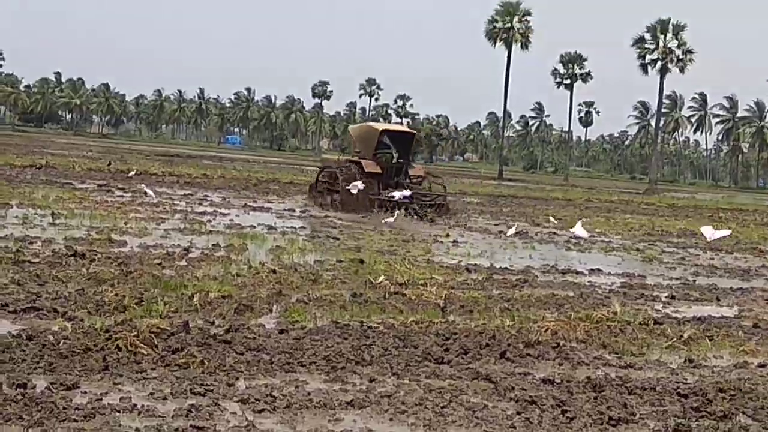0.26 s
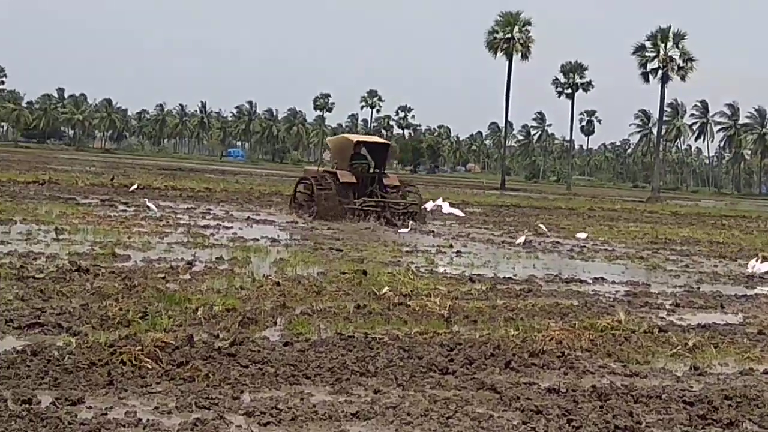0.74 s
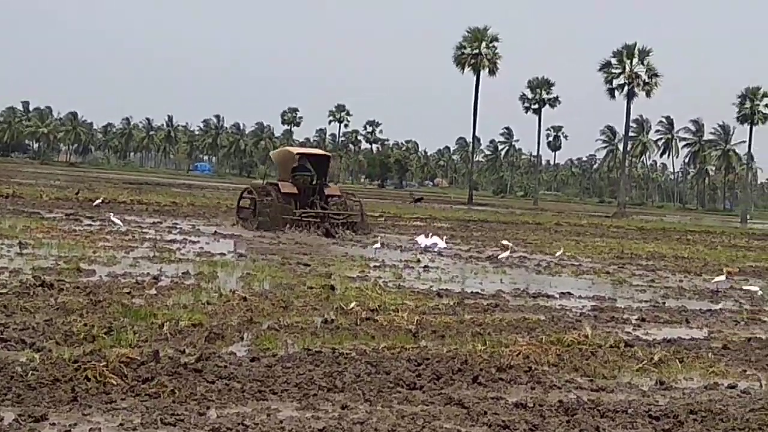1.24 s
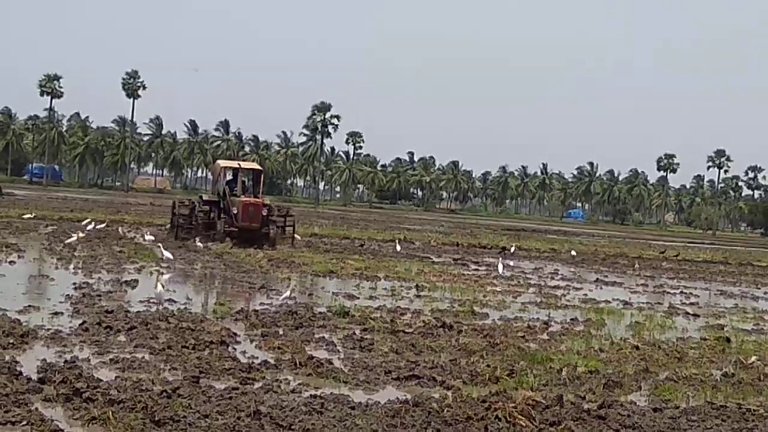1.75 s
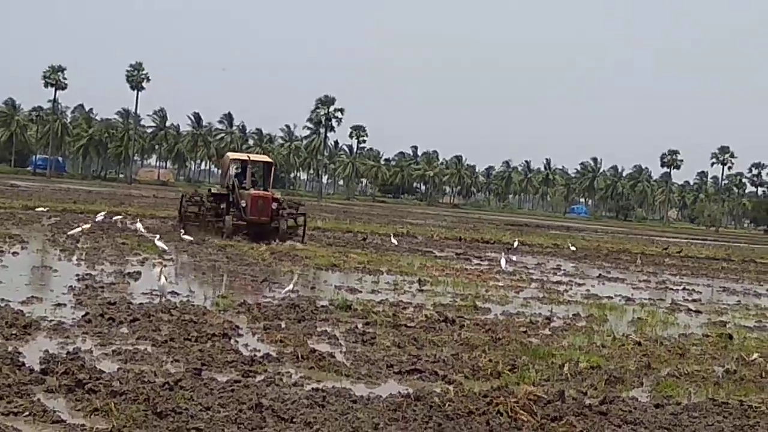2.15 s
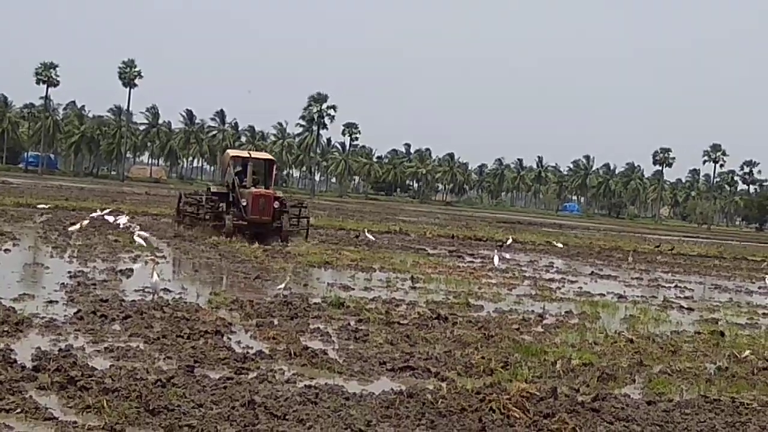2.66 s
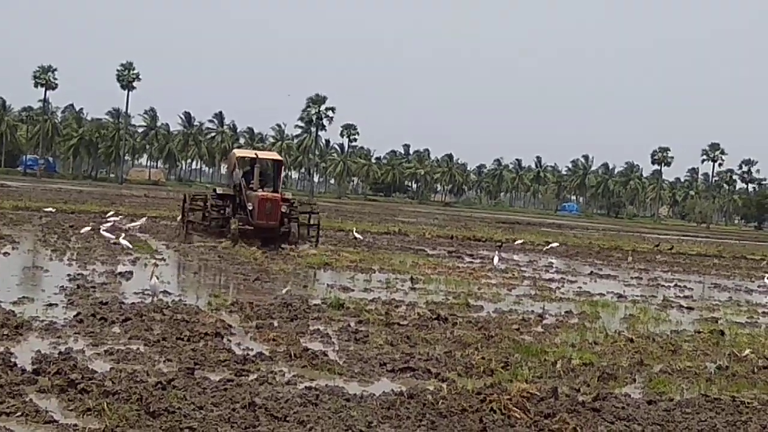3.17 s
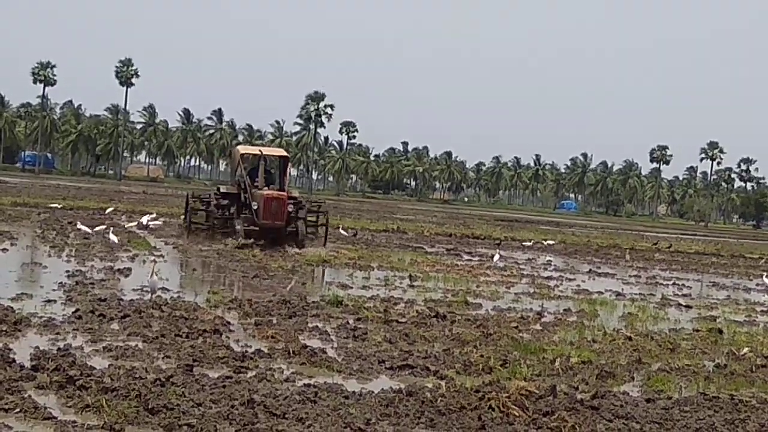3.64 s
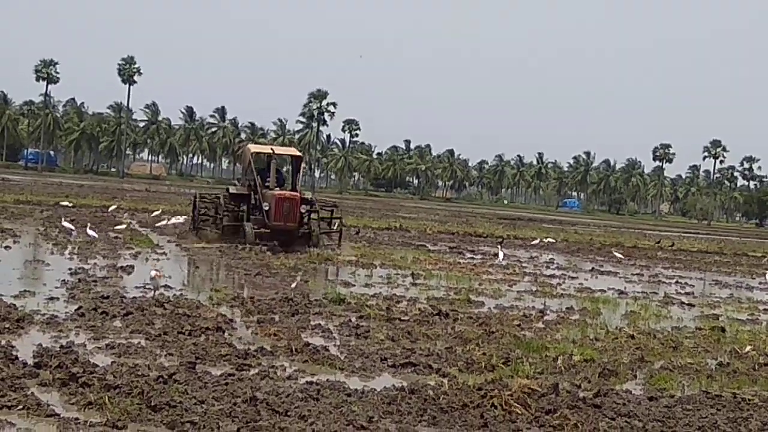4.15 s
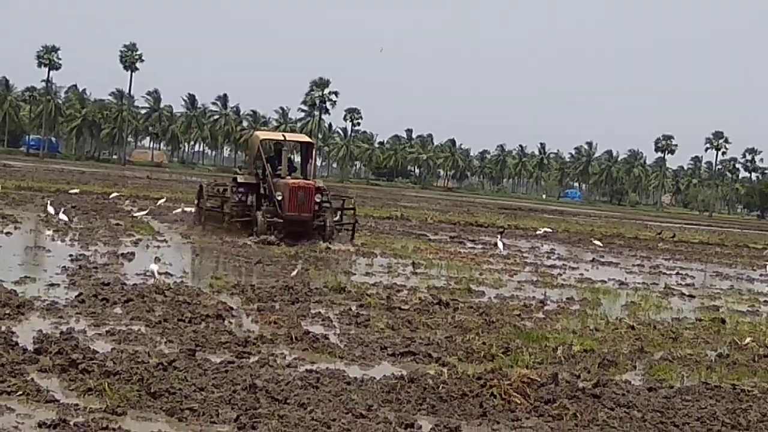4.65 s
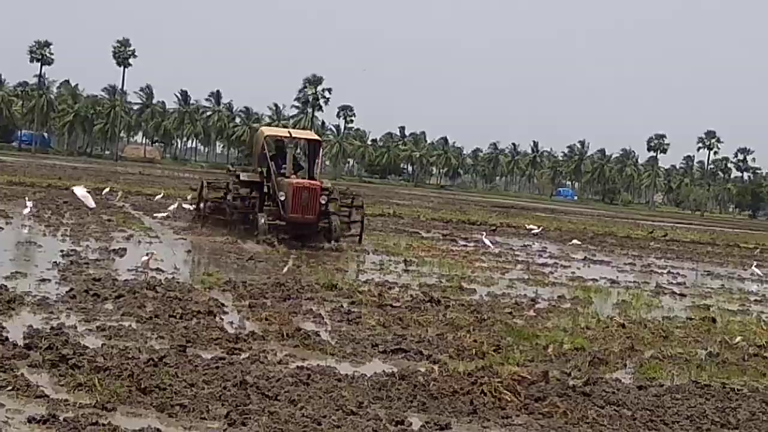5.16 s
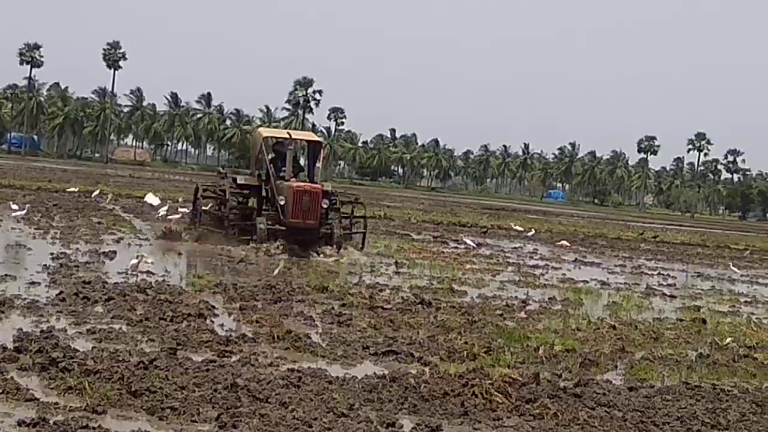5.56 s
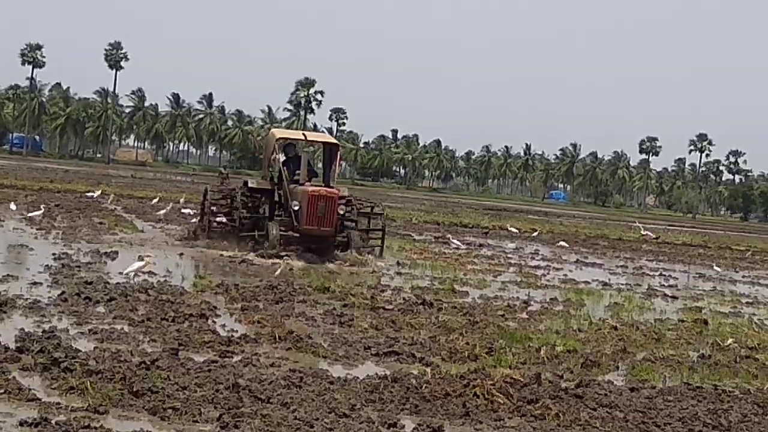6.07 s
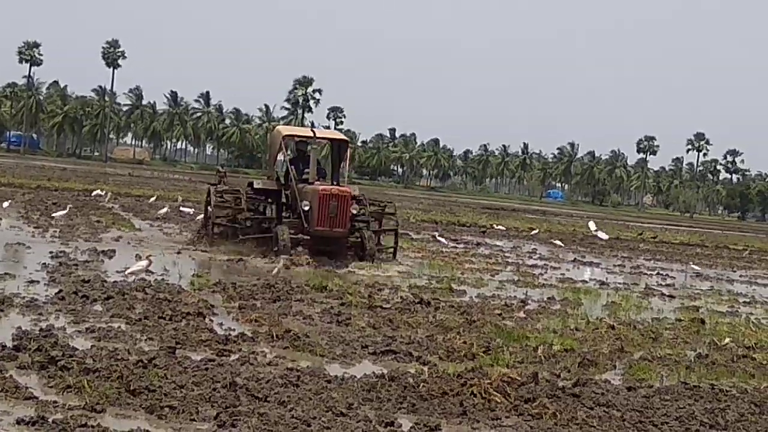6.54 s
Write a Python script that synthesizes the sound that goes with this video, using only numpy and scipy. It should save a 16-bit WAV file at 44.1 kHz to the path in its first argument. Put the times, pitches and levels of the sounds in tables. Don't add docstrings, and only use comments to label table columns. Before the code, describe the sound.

Outdoors in a flooded field, a handheld phone is overloaded by wind for just over a second: deep roaring and slapping, mostly on the left, with a thin tractor rattle behind. A sudden cut brings the diesel nearer, a low steady drone with block clatter and rapid valve ticking. Breaths of wind still bump the left side while the engine slowly grows louder.

```python
import sys
import numpy as np
from scipy import signal
from scipy.fft import rfft, irfft, dct, next_fast_len
from scipy.io import wavfile
from scipy.ndimage import uniform_filter1d, minimum_filter1d

SR = 44100
rng = np.random.default_rng(int(sys.argv[2]) if len(sys.argv) > 2 else 0)


def magnitude_from_level(level_db):
    exponent = np.asarray(level_db, float) / 20
    return 10 ** exponent


def dump_mix(stems):
    frames = np.atleast_2d(stems).T
    limited = np.clip(frames, -1, 1)
    pcm = np.round(limited * 32767).astype(np.int16)
    wavfile.write(sys.argv[1], SR, pcm)


N = 300321
TIME = np.arange(N) / SR
FFT_SIZE = next_fast_len(N, True)
HZ = np.arange(FFT_SIZE // 2 + 1) * SR / FFT_SIZE
CUT_S = 1.339
LULL_DB = -37

# (frequency [Hz], left level [dB], right level [dB])
WIND_COLOUR = [(20, -12, -23), (40.3, -8, -30), (73, -2.5, -14), (98, 4.5, -19.5), (131, 0.5, -27),
               (165, 4.5, -25), (192, -1.5, -23), (238, -2, -27), (407, -9.5, -44), (627, -18, -60),
               (886, -25, -52), (1350, -38, -51), (2120, -50.5, -59)]
# (low edge [Hz], high edge [Hz], swell [dB], swell rate [1/s])
EDDY_SWELLS = [
    (0, 110, 2, 14),
    (109.1, 190, 1.5, 12.6),
    (195.3, 330, 2.0, 16),
    (332, 5200, 1.4, 17.9),
]
# (time [s], level [dB])
GALE_STIFFNESS = [(0, -4), (.16, 0.5), (.27, -3), (.4, 0.5), (.62, 0.5), (.74, 0), (.84, 4), (.95, -1),
                  (1.04, 6), (1.12, -2), (1.24, 0), (1.339, 2.5)]
# (opening time [s], level [dB], closing rate [dB/s])
WIND_FILTER = [(0, -10, 3), (.22, -1, -4), (.88, -2, 63), (1.045, -2, 28), (1.2, 3, 5), (1.339, -10, 5),
               (1.55, -6, 32), (1.72, -5.5, 6.5), (2.6, -2.5, 33), (2.98, -3.5, 33), (3.63, -14.5, 1),
               (3.95, -4, 39), (4.279, -2.5, 15), (4.5, -3, 3), (5.15, -2, 15), (5.55, -3, 12),
               (5.85, -5.5, 0.5)]
# (time [s], level [dB])
GALE_CRACKS = [(0.051, -24.5), (0.074, -33), (0.107, -30), (0.129, -21), (0.149, -22), (0.182, -23),
               (0.225, -22.5), (0.271, -34), (0.295, -30), (0.361, -27), (0.383, -18), (0.432, -28),
               (0.455, -23), (0.484, -26), (0.542, -25.5), (0.572, -30), (0.614, -22), (0.668, -26),
               (0.692, -25.5), (0.727, -21), (0.764, -26), (0.825, -22), (0.852, -18.5), (0.876, -33),
               (0.896, -26), (0.939, -25), (0.984, -18), (1.017, -20.5), (1.047, -13), (1.09, -32),
               (1.127, -22), (1.174, -23), (1.197, -32), (1.228, -28), (1.299, -35)]
# (frequency [Hz], left level [dB], right level [dB])
FAR_COLOUR = [(875, -6.5, -19), (1500, -7, -18), (2510, -16.5, -21), (2980, -30, -28.5),
              (3560, -23.5, -36.5), (4070, -37, -46.5), (4370, -21.5, -48), (4720, -33, -36.5),
              (5000, -24, -35.5), (5600, -19.5, -42), (6000, -17.5, -30), (6980, -26, -32.5),
              (7570, -38, -38.5), (8300, -36, -43), (9060, -28, -45), (9800, -45, -30), (10800, -51, -47),
              (11540, -23, -48), (12600, -25, -39), (13400, -44, -32), (14000, -42, -32), (15200, -37, -34),
              (15400, -42, -52)]
# (frequency [Hz], phase [rad])
PORT_LEAD = [(0, 0), (2500, -1.6), (3790, -4.6), (4740, -3.4), (6370, -2.7), (7840, -9.3), (9820, -9.4),
             (10200, -10.5), (10600, -9.4), (11600, -15.5), (13000, -19.2), (14400, -18.8), (14900, -21.4),
             (15400, -22.1)]
# (time [s], rate [Hz])
FIRING_RATE = [(1.339, 60.47), (1.6, 63.13), (1.85, 65.6), (2.1, 67.93), (2.35, 69.26), (2.7, 69.59),
               (3.1, 68.95), (3.3, 69.61), (3.55, 70.26), (3.9, 69.21), (4.2, 70.17), (4.45, 67.22),
               (4.75, 68.28), (5.1, 69.01), (5.6, 68.99), (6.1, 69.1), (6.4, 69.02), (6.81, 67.24)]
# (start [s], length [s], level [dB])
LEFT_GUSTS = [(1.33, 0.037, -22), (1.397, 0.055, -13.5), (1.464, 0.062, -12.5), (1.577, 0.075, -13.5),
              (1.788, 0.062, -23), (1.898, 0.088, -20), (1.996, 0.068, -33), (2.127, .08, -18.5),
              (2.278, 0.097, -20.5), (2.396, 0.09, -23), (2.523, 0.089, -22), (2.664, 0.12, -14),
              (3.06, 0.081, -17), (3.195, 0.045, -27), (3.369, 0.061, -9.5), (3.456, 0.039, -15.5),
              (3.543, 0.1, -25), (3.68, 0.037, -14), (3.754, 0.029, -16.5), (3.808, 0.041, -19),
              (3.987, 0.065, -22), (4.074, 0.085, -15), (4.254, 0.35, -25), (4.555, 0.29, -21),
              (4.81, 0.06, -16), (4.894, 0.43, -22), (5.456, 0.12, -19), (5.551, 0.1, -18),
              (5.69, 0.32, -22.5), (6.116, 0.32, -20.5), (6.403, 0.091, -19.5), (6.48, 0.047, -14.5),
              (6.649, .07, -11.5), (6.741, .08, -9.5)]
# (time [s], level [dB])
ENGINE_EFFORT = [(1.35, -0.5), (1.6, 0.5), (1.85, 0), (2.2, 1.5), (2.5, -1.5), (2.68, 2.5), (2.9, -2.5),
                 (3.15, 1), (3.35, -1), (3.7, -1), (4.1, 1.5), (4.5, 3.5), (4.82, 5), (5.0, 3.5),
                 (5.45, 4.5), (5.65, 4), (6.2, 6), (6.81, 8)]
# (multiple of the firing rate [1], level [dB])
EXHAUST_PARTIALS = [(.5, -20), (1, -3), (1.5, -34), (2, 2), (3, -14.5), (4, -15.5), (5, -25.5)]
# (low edge [Hz], high edge [Hz], delay [turns], fall [turns], steady share [1], scatter [dB])
BLOCK_PARTS = [
    (200, 1080, 0.2, 0.63, 1.6, 3),
    (1035, 1900, 0.1084, 0.15, 0.63, 2),
    (1914, 2980, 0.06, 0.22, 0.9, 2.5),
    (3170, 4070, 0.038, 0.24, 1.1, 1),
]
# (frequency [Hz], left level [dB], right level [dB])
CLATTER_COLOUR = [(308, -2, -20), (453, -8, -28.5), (542, -10.5, -11), (840, -3, -14), (1103, -16.5, -22),
                  (1577, -9, -14), (2060, -16, -20), (2360, -15, -15), (2830, -17, -27.5), (3505, -19, -29),
                  (3930, -23.5, -34), (5090, -23.5, -33)]
# (frequency [Hz], width [Hz], depth [dB], negative = lift)
RINGING_PANELS = [(638, 19, -1), (748, 36, 1), (864, 18, -2.5), (996, 15, -2.5), (1600, 56, 0.5),
                  (2150, 150, -3), (2415, 66, -2)]
# (upper edge [Hz], level [dB], held until [s], return [s])
HELD_BASS = [
    (712, -10.5, 1.96, 0.033),
    (1050, -6.5, 1.6, 0.072),
]
# (low edge [Hz], high edge [Hz], delay [turns], fall [turns], steady share [1], scatter [dB])
VALVE_PARTS = [
    (3000, 9340, 0.0, 0.43, 2.5, 6.3),
    (8640, 11500, 0.02, 0.14, 0.56, 4.9),
    (11220, 19000, 0.025, 0.082, 0.21, 3.2),
]
# (frequency [Hz], left level [dB], right level [dB])
TICK_COLOUR = [(4200, -4.1, -12), (5000, -5, -8), (6200, -11.1, -7.3), (7500, -3.7, -6.6),
               (8600, -6.1, -7.9), (9200, -7.5, -5.8), (9900, 0.0, -1.7), (10800, -3.6, -5.0),
               (11800, -3.8, -8), (12500, -1.3, -8), (13500, -1.5, -4.1), (14500, -4.1, -4.6),
               (15300, -8.1, -7.7), (15900, -14.6, -14.7)]
# (time [s], level over the ticks [dB])
LOOSE_JANGLES = [(1.366, 5.5), (1.82, 2), (2.02, 0), (2.3, 2.5), (2.62, 1), (3.11, 0.5), (3.24, 0.5),
                 (3.31, 3), (3.55, -1.5), (3.89, 1), (5.6, 1)]
# (time [s], level [dB])
VALVE_KNOCKS = [(1.3388, -26), (1.3533, -18), (1.3698, -20), (1.3872, -14), (1.7699, -23), (1.8163, -13),
                (1.9978, -30), (2.0123, -17), (2.0717, -31), (2.1011, -18), (3.1133, -18), (3.2874, -25),
                (3.3019, -19), (4.0317, -29), (4.4657, -21), (4.5396, -21), (4.57, -21), (4.5989, -22),
                (4.6583, -24), (4.7471, -25), (4.8055, -25), (4.8933, -26), (4.9072, -24), (4.9362, -20),
                (4.9796, -22), (5.0374, -32), (5.1247, -25), (5.212, -22), (5.2554, -22), (5.2988, -21),
                (5.3427, -24), (5.4006, -27), (5.4585, -25), (5.4724, -24), (5.5019, -24), (5.5603, -25),
                (5.5742, -20), (5.5892, -19), (5.6032, -14), (5.6471, -20), (5.7773, -31), (5.9653, -30),
                (6.0087, -34), (6.0816, -19), (6.1539, -22), (6.1684, -21), (6.1828, -17), (6.2836, -22),
                (6.3415, -15), (6.3998, -23), (6.4143, -21), (6.4427, -19), (6.4722, -24), (6.4861, -16),
                (6.531, -20), (6.6188, -23), (6.6627, -16), (6.7366, -26), (6.7505, -22), (6.7795, -20)]
# (frequency [Hz], width [Hz], depth [dB])
LEFT_DIPS = [(5950, 320, 13), (6900, 280, 6), (8400, 330, 7), (9100, 330, 7), (11400, 250, 8),
             (14600, 400, 5), (15500, 400, 3)]
# (frequency [Hz], width [Hz], depth [dB])
RIGHT_DIPS = [(4150, 200, 7), (8150, 200, 6), (8850, 230, 8), (11500, 250, 6), (12600, 230, 6),
              (15600, 300, 3)]
# (frequency [Hz], width [Hz], depth [dB])
SUM_DIPS = [(3100, 290, 15), (5500, 200, 4), (8000, 300, 7), (8800, 200, 5), (11500, 250, 7),
            (15500, 400, 5)]
# (frequency [Hz], width [Hz], depth [dB])
LATE_SUM_DIPS = [(3100, 160, 5), (8500, 300, 4), (5450, 360, 9), (11500, 250, 5), (15500, 500, 8)]
# (frequency [Hz], width [Hz], depth [dB])
NARROW_DIPS = [(564, 26, 4.5), (690.4, 14.4, 17.5), (815.5, 23.6, 14.5), (933, 29, 8), (1057, 19, 10)]


def curve(table):
    return np.interp(TIME, *np.transpose(table))


def shape(x, gain):
    return irfft(rfft(x, FFT_SIZE) * gain, FFT_SIZE)[..., :N]


def band(x, low_hz, high_hz):
    return shape(x, (HZ >= low_hz) & (HZ < high_hz))


def dips(table):
    return magnitude_from_level(sum(-db * np.exp(-((HZ - hz) / width) ** 2) for hz, width, db in table))


def colour(x, table):
    edge_db = -40
    hz, *levels = np.transpose(table)
    pitch = np.log(np.r_[hz[0] * .8, hz, hz[-1] * 1.05])
    levels = [np.r_[db[0] + edge_db, db, db[-1] + edge_db] for db in levels]
    y = shape(x, magnitude_from_level([np.interp(np.log(HZ + 1), pitch, db) for db in levels]))
    return y / np.std(y[1])


def walk(rate):
    hold = int(SR / rate)
    levels = np.repeat(rng.standard_normal(N // hold + 1), hold)
    return 1.22 * uniform_filter1d(uniform_filter1d(levels, hold), hold)[:N]


def eddies():
    left_db = np.where(TIME > CUT_S, 2.4, 2.6) * walk(35)
    right_db = 4.0 * walk(45) + 1.1 * walk(15.0)
    x = colour(rng.standard_normal((2, N)) * magnitude_from_level([left_db, right_db]), WIND_COLOUR)
    return x / np.std(x, axis=1, keepdims=True)


def wind_filter_db():
    latest = np.searchsorted(np.transpose(WIND_FILTER)[0], TIME) - 1
    opens, db, closing = np.transpose(WIND_FILTER)[:, np.clip(latest, 0, None)]
    return uniform_filter1d(db - closing * (TIME - opens), size=600)


def gale(eddy, filter_db):
    left_db, right_db, stiff_hz = -0.5, -26.5, 186.6
    x = eddy * magnitude_from_level([left_db + 0 * TIME, right_db + filter_db])
    x[0] = sum(band(x[0], low, high) * magnitude_from_level(db * walk(rate)) for low, high, db, rate in EDDY_SWELLS)
    x[0] += (magnitude_from_level(curve(GALE_STIFFNESS)) - 1) * band(x[0], stiff_hz, 4000)
    return x


def cracks():
    fall_s, corner_hz = 0.0026, 980
    s = TIME[TIME < CUT_S]
    gate = sum(magnitude_from_level(db) * (s > at) * np.exp(-np.abs(s - at) / fall_s) for at, db in GALE_CRACKS)
    noise = np.pad(gate, (0, N - len(s))) * rng.standard_normal(N)
    crack = shape(noise, 26 / (1 + (HZ / corner_hz) ** 3))
    return np.array([crack, 0.018 * crack])


def firings():
    far_hz = 66.13
    turns = np.cumsum(np.where(TIME > CUT_S, curve(FIRING_RATE), far_hz)) / SR
    return turns + (-turns[int(CUT_S * SR)]) % 1 + 1


def puffs(turns, delay, fall, steady, scatter_db):
    turns = turns - delay
    size = magnitude_from_level(scatter_db * rng.standard_normal(N // 100))[turns.astype(int) + 1]
    gate = steady + uniform_filter1d(size * np.exp(-(turns % 1) / fall), size=60)
    return gate / np.sqrt(np.mean(gate ** 2))


def ports(gate, alike):
    shared, own = gate * rng.standard_normal(N), gate * rng.standard_normal((2, N))
    late = shape(shared, np.exp(1j * np.interp(HZ, *np.transpose(PORT_LEAD))))
    return np.sqrt(alike) * np.array([late, shared]) + np.sqrt(1 - alike) * own


def distant_rattle(turns):
    gate = puffs(turns, delay=0.14, fall=0.18, steady=3.4, scatter_db=1.8)
    return colour(ports(gate, alike=0.13), FAR_COLOUR) * magnitude_from_level(-42 + walk(8.86))


def gusts_db():
    rise_s, fall_s = 0.034, 0.058
    s = TIME[::100]
    start, length, db = np.transpose(LEFT_GUSTS)[:, :, None]
    rise = np.clip((s - start) / rise_s, 0, 1)
    fall = np.exp(-2 * np.clip(s - start - length, 0, None) / fall_s)
    power = magnitude_from_level(2 * db) * rise ** 2 * fall
    return np.interp(TIME, s, 10 * np.log10(magnitude_from_level(2 * LULL_DB) + power.sum(axis=0)))


def breeze(eddy, gust_db, filter_db):
    right_db, rush_hz, rush_slope, strong_db = -30, 155, 0.23, -8.5
    duller = (1 + 60. / (HZ + 60.0)) / np.sqrt(1 + (HZ / 410.0) ** 4)
    x = shape(eddy, duller) * magnitude_from_level([gust_db, right_db + 0.48 * filter_db])
    x[0] += (magnitude_from_level(rush_slope * (gust_db - strong_db)) - 1) * band(x[0], rush_hz, 4000)
    return x


def exhaust_boom(turns, effort, gust_db, filter_db):
    upper_slope = 0.52
    boom = 0
    for k, db in EXHAUST_PARTIALS:
        waver_db = 0.13 * min(k, 3.4) ** 3.03 * walk(11)
        growth_db = upper_slope * max(k - 2, 0) * (effort - 6.0)
        phase = 2 * np.pi * k * (turns + 0.341) - 4.8 + 0.024 * min(k, 3.4) ** 3 * walk(13)
        boom = boom + np.sqrt(2) * magnitude_from_level(db + waver_db + growth_db) * np.cos(phase)
    left_db = -23.5 + 0.77 * effort + 0.16 * (gust_db - LULL_DB)
    right_db = -22.5 + 0.98 * effort + filter_db
    return boom * magnitude_from_level([left_db, right_db])


def rattle(turns, parts, alike):
    total = 0
    for low, high, *timing in parts:
        gate = puffs(turns, *timing) * magnitude_from_level(0.92 * walk(8))
        total = total + band(ports(gate, alike), low, high)
    return total


def block_clatter(turns, effort):
    clatter = colour(rattle(turns, BLOCK_PARTS, 0.87), CLATTER_COLOUR) * magnitude_from_level(-36.5 + effort)
    ringing = np.clip(0.4 + 0.091 * effort + 0.4 * walk(2.8), 0, 1.3)
    clatter = clatter + ringing * shape(clatter, dips(RINGING_PANELS) - 1)
    for under_hz, db, until, back in HELD_BASS:
        held_db = db / (1 + np.exp((TIME - until) / back))
        clatter = clatter + (magnitude_from_level(held_db) - 1) * band(clatter, 0, under_hz)
    return clatter


def jangle_db():
    width_s = 0.081
    s = TIME[::100]
    return np.interp(TIME, s, sum(db * np.exp(-((s - at) / width_s) ** 2) for at, db in LOOSE_JANGLES))


def valve_ticks(turns, effort, filter_db):
    level_db = -36.5 + 0.82 * effort + 0.19 * filter_db + jangle_db()
    return colour(rattle(turns, VALVE_PARTS, 0.4), TICK_COLOUR) * magnitude_from_level(level_db)


def valve_knocks():
    trim_db, fall_s, low_hz = -6.5, 0.003, 8840
    at, db = np.transpose(VALVE_KNOCKS)
    gate = np.zeros(N)
    gate[(at * SR).astype(int)] = magnitude_from_level(db + trim_db)
    gate = signal.lfilter([1], [1, -np.exp(-1 / (fall_s * SR))], gate)
    return uniform_filter1d(gate, size=30) * band(colour(ports(1, 0.5), TICK_COLOUR), low_hz, 17000)


def treble_dips(x):
    left, right = shape(x, np.array([dips(LEFT_DIPS), dips(RIGHT_DIPS)]))
    near = np.clip((TIME - 4.0) / 1.0, 0, 1)
    total, difference = left + right, left - right
    total = (1 - near) * shape(total, dips(SUM_DIPS)) + near * shape(total, dips(LATE_SUM_DIPS))
    return np.array([total + difference, total - difference]) / 2


def scene():
    eddy, filter_db, turns = eddies(), wind_filter_db(), firings()
    far = gale(eddy, filter_db) + distant_rattle(turns)
    gust_db, effort = gusts_db(), curve(ENGINE_EFFORT)
    boom = exhaust_boom(turns, effort, gust_db, filter_db)
    metal = block_clatter(turns, effort) + valve_ticks(turns, effort, filter_db) + valve_knocks()
    near = breeze(eddy, gust_db, filter_db) + boom + treble_dips(metal)
    return np.where(TIME > CUT_S, near, far) + cracks()


def starve(x, under_db, windy_db, from_hz, gale_bar, calm_bar, steps=None):
    hop, lead = 1024, 1253
    window = signal.windows.kaiser_bessel_derived(2 * hop, 4 * np.pi)
    count = (N + lead) // hop + 1
    blocks = np.pad(x, ((0, 0), (lead, (count + 1) * hop - N - lead))).reshape(2, -1, hop)
    frames = np.concatenate([blocks[:, :-1], blocks[:, 1:]], axis=2) * window
    a, b, c, d = np.split(frames, 4, axis=2)
    cells = dct(np.concatenate([-c[..., ::-1] - d, a - b[..., ::-1]], axis=2), type=4, norm="ortho")
    s = ((np.arange(count) + 1) * hop - lead)[:, None] / SR
    hz = np.arange(hop) * SR / 2 / hop
    narrow = (cells ** 2).reshape(2, count, 64, 16).mean(axis=3)
    around = uniform_filter1d(uniform_filter1d(narrow.mean(axis=0), size=9, axis=1), size=3, axis=0)
    usual = np.median(narrow[:, :, 12:45], axis=(0, 2))[:, None]
    around = np.maximum(around, usual * np.where(s < CUT_S, gale_bar, calm_bar))
    wobble_db = 3.5 * uniform_filter1d(rng.standard_normal(narrow.shape), size=4, axis=1)
    held = uniform_filter1d(narrow, size=3, axis=1)
    bar = around * magnitude_from_level(2.5 * (np.where(s < CUT_S, windy_db, under_db) + wobble_db))
    cells = cells * (np.repeat(held > bar, 16, axis=2) | (hz < from_hz))
    if steps:
        local = np.sqrt(np.abs(np.minimum(around, 3 * held))) * magnitude_from_level(wobble_db)
        step = np.repeat(local, 16, axis=2) * magnitude_from_level(-np.interp(hz, *np.transpose(steps))) + 1e-9
        cells = np.sign(cells) * np.floor(np.abs(cells) / step + .42) * step
    u, v = np.split(dct(cells, type=4, norm="ortho"), 2, axis=2)
    frames = np.concatenate([v, -v[..., ::-1], -u[..., ::-1], -u], axis=2) * window
    first, second = np.split(frames, 2, axis=2)
    return (first[:, 1:] + second[:, :-1]).reshape(2, -1)[:, lead - hop:lead - hop + N]


def band_limit(x):
    return signal.sosfilt(signal.butter(12, 15810, fs=SR, output="sos"), x)


def record(dry):
    ceiling = 0.92
    swing = -minimum_filter1d(-np.abs(dry), size=300, axis=1)
    swing = uniform_filter1d(uniform_filter1d(swing, size=150, axis=1), size=150, axis=1)
    limited = dry * ceiling / (ceiling ** 4 + swing ** 4) ** 0.26
    return band_limit(shape(limited, dips(NARROW_DIPS)))


dry = scene()
out = record(dry)
dump_mix(out)
```